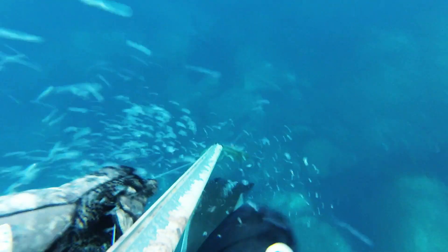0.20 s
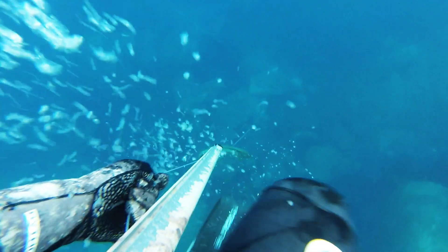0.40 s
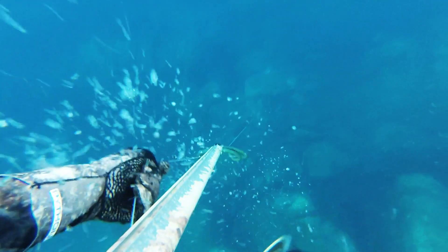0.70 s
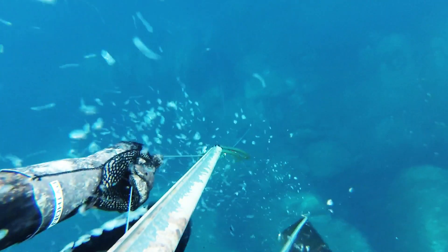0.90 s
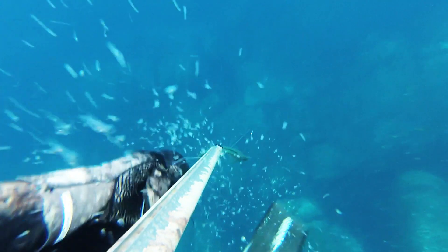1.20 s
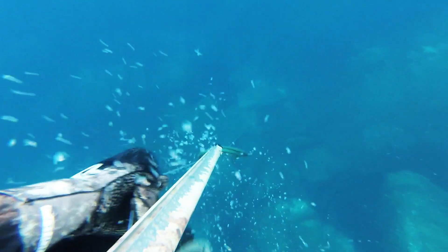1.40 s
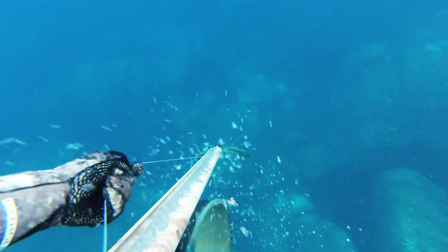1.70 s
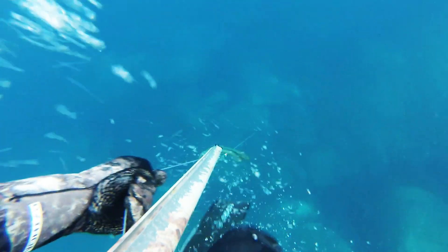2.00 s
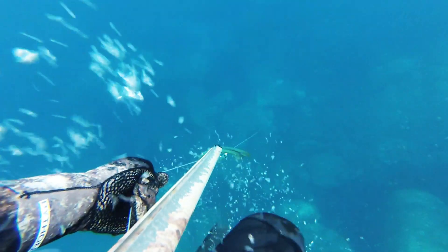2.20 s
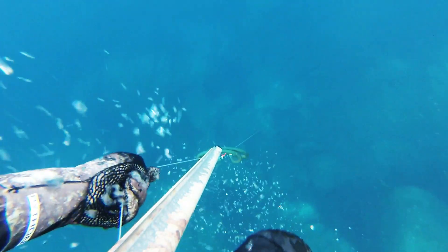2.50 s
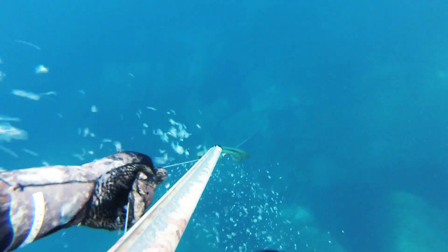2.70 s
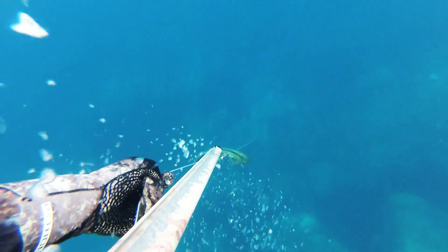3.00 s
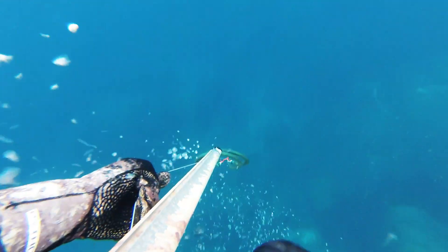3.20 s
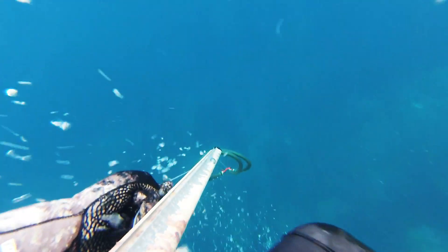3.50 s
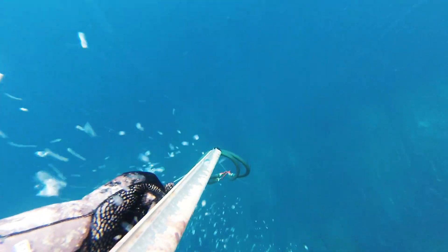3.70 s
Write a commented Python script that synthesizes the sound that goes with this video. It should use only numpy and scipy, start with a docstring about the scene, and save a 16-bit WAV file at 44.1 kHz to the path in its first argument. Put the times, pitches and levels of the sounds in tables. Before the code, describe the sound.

Underwater swimming strokes begin around 0.2 s, heard through a resonant waterproof camera case. Until about 3.2 s, gurgling churn pulses two or three times a second, each with deep swirl, fizzing wash and a warbling rush that rises and falls. A hard gear knock lands near 0.3 s, duller ones later. Bubbles and crackling ticks dot it. A weak stir ends around 3.6 s, leaving quiet swirl, hiss and faint high whine.

```python
"""Under water, inside a waterproof camera housing: a diver swims with a speargun.
Nine strokes, with a few weaker stirs before and after them, stir the water into gurgling lumps, a deep swirl
and a fizzing wash. Surges of speed bring a turbulent rush and a vortex tone that rise and fall with the speed.
Resonances of the housing colour the water noise. Gear knocks, bubbles ring, and sharp ticks dot the sea's hiss,
with a faint steady whine on top."""
import sys
import numpy as np
from scipy import signal
from scipy.fft import rfft, irfft
from scipy.io import wavfile

SR = 44100
rng = np.random.default_rng(int(sys.argv[2]) if len(sys.argv) > 2 else 0)


def store_pcm(level_fs):
    """Save levels as 16-bit WAV."""
    pcm = np.round(np.clip(level_fs, -1, 1) * 32767).astype(np.int16)
    wavfile.write(sys.argv[1], SR, np.atleast_2d(pcm).T)


N = 167580  # length in samples

# strokes and weaker stirs of the water; the levels are taken before the overall trims and the housing:
# (start [s], end [s], rise [s], churn level [dB], deep swirl level [dB], wash level [dB])
STROKE_TABLE = [(0.165, 0.389, 0.0058, -42, -47.5, -57), (0.603, 0.955, 0.0096, -40, -45, -65),
                (1.118, 1.317, 0.0023, -35, -43, -61.5), (1.481, 1.731, 0.0071, -38.5, -48.5, -58),
                (1.872, 2.119, 0.013, -39.5, -46.5, -62), (2.214, 2.497, 0.0038, -41.5, -48, -62),
                (2.58, 2.638, 0.0026, -43.5, -71, -80), (2.648, 2.833, .0024, -37.5, -46, -61.5),
                (2.826, 2.97, 0.019, -45.5, -55, -67), (3.014, 3.178, 0.01, -41.5, -46, -57),
                (3.157, 3.346, 0.0076, -60.5, -56.5, -65.5), (3.367, 3.564, 0.0036, -44.5, -57, -62.5)]
# surges of speed as the water is stirred; the levels are taken before the overall trims and the housing:
# (time of top speed [s], rise [s], fall [s], top pitch [Hz], rush level [dB], vortex tone level [dB])
SURGE_TABLE = [(0.271, 0.07, 0.085, 1020, -39.5, -33.5), (.385, 0.043, 0.034, 790, -45.5, -46),
               (.745, 0.097, 0.062, 920, -40.5, -39.5), (0.874, 0.084, 0.078, 790, -48.5, -44),
               (1.191, 0.05, 0.052, 680, -47, -50), (1.245, 0.053, 0.066, 830, -37, -38),
               (1.577, 0.055, 0.075, 929.7, -40.5, -36), (1.695, 0.077, 0.07, 770, -47.5, -46.5),
               (1.935, 0.038, 0.061, 750, -48, -42), (2.035, 0.1, 0.079, 800, -40.5, -33.5),
               (2.333, 0.055, 0.064, 1015, -38.5, -33.5), (2.425, 0.094, 0.053, 680, -43.5, -65),
               (2.699, 0.058, 0.052, 680, -40, -38), (2.764, 0.055, 0.06, 898, -44, -43.5),
               (2.88, 0.084, .12, 620, -54, -45), (3.09, 0.065, 0.065, 880, -40.5, -36),
               (3.465, 0.065, 0.064, 630, -44, -45.5)]


def from_db(db):
    """Decibels to gain."""
    return 10 ** (np.asarray(db) / 20)


def rms_one(x):
    """Scale to an rms of 1."""
    return x / np.sqrt(np.mean(x ** 2) + 1e-20)


def drift(rate):
    """Slow random wandering with an rms of about 1; a higher rate [Hz] wanders faster."""
    step = 40  # samples between the points of the slow curve
    r = np.exp(-2 * np.pi * rate * step / SR)
    raw = rng.standard_normal(N // step + 2002)
    slow = signal.lfilter([1], [1, -2 * r, r * r], raw)[2000:]  # drop the filter's start-up
    return np.interp(np.arange(N) / step, np.arange(len(slow)), rms_one(slow))


def colour(x, spectrum):
    """Give a signal the spectrum's gains, with nothing below 12 Hz."""
    hz, db = np.transpose(spectrum)
    bins = np.arange(N // 2 + 1) * SR / N + 1e-3
    gain = from_db(np.interp(np.log(bins), np.log(hz), db)) * (bins > 12)
    return irfft(rfft(x) * gain, N)


def noise(spectrum):
    """Noise of the given spectrum, rms 1."""
    return rms_one(colour(rng.standard_normal(N), spectrum))


def grains(per_s, spread_db):
    """Random impulses of either sign, mostly small with a few larger ones."""
    size_db = spread_db * np.minimum(rng.exponential(1, N), 3)
    sizes = from_db(size_db) * rng.choice([-1, 1], N)
    return sizes * (rng.random(N) < per_s / SR)


def fizz(spectrum):
    """Dense tiny collapses of uneven size, rms 1."""
    return rms_one(colour(grains(per_s=900, spread_db=4.5), spectrum))


def ring(clicks, hz, t60):
    """A unit click sets a sine of height about 1 ringing; it drops by 60 dB in t60 seconds."""
    r = np.exp(-np.log(1000) / (t60 * SR))
    w = 2 * np.pi * hz / SR
    return signal.lfilter([0, np.sin(w)], [1, -2 * r * np.cos(w), r * r], clicks + 1e-18)


def swell(t, start, end, rise_s, fall_s):
    """Smooth attack, hold and release."""
    attack = (1 + np.tanh((t - start) / rise_s / 2)) / 2
    release = (1 - np.tanh((t - end) / fall_s / 2)) / 2
    return attack * release


def speed_of(age, rise_s, fall_s):
    """Speed in a surge, 1 at its top."""
    return 1 / (1 + (age / np.where(age < 0, rise_s, fall_s)) ** 2)


def stirring(t):
    """Near 1 while a stroke drives the water, near 0 between strokes; it stalls just before a stroke ends."""
    lead_s, stall_s = .015, .01
    drive = sum(swell(t, start, end - lead_s, rise_s, stall_s) for start, end, rise_s, *_ in STROKE_TABLE)
    return np.minimum(1, drive)


def housing(x):
    """Each resonance of the case lifts a narrow band and lets it ring, or weakens it if its boost is negative."""
    # resonances of the case: (pitch [Hz], width [Hz], boost [dB])
    resonances = [(87.8, 13.6, 10), (155.4, 6.4, 12), (313.7, 25.5, 11), (568, 78, 4.5), (743, 32.2, 12),
                  (1670, 130, 9), (2114, 930, -5.5)]
    for hz, width_hz, boost_db in resonances:
        r = np.exp(-np.pi * width_hz / SR)
        top = np.array([1, 0, -1]) * (1 - r * r) / 2
        bottom = [1, -2 * r * np.cos(2 * np.pi * hz / SR), r * r]
        x = x + (from_db(boost_db) - 1) * signal.lfilter(top, bottom, x)
    return x


def sea():
    """The sea's steady hiss is random noise with a shaped spectrum, before the housing."""
    # spectrum of the open water: (frequency [Hz], relative level [dB])
    sea_spectrum = [(30, 15), (150, 2), (300, -3), (750, -24), (1250, -13.5), (1800, -14.5), (2800, -12),
                    (4200, -22), (5000, -19.5), (6800, -20), (8000, -16.5), (8900, -22), (9900, -23),
                    (11000, -23), (13300, -17.5), (15000, -41)]
    return from_db(-69.5) * noise(sea_spectrum)


def whine():
    """A very faint, high, nearly steady sine wavers slightly in pitch."""
    hz = 13135 + 10 * drift(11.0)
    return from_db(-92) * np.sin(2 * np.pi * np.cumsum(hz) / SR)


def ticks(size=300):
    """Near snaps, dull or bright, each a crack with a brief scatter behind it, over a crackle of far ones."""
    # near ticks, probably snapping shrimp; brightness tilts the level around 7 kHz:
    # (time [s], level before trims [dB], brightness [dB per octave])
    near_snaps = [(.404, -59, -4), (0.617, -53, 11), (.8245, -55, 14), (.8589, -49, 9),
                  (0.8748, -66, -20.5), (0.9408, -52.5, -2.5), (0.987, -56, 9), (1.175, -52, -3),
                  (1.5514, -50.5, 6), (1.8862, -42, -2), (2.0036, -54.5, 5), (2.014, -54, 7),
                  (2.2455, -56.5, 6), (2.4617, -63, 7), (2.581, -49, 5), (2.66, -53, 7), (2.6843, -52, 6),
                  (2.7272, -43, -6), (2.792, -43, -2.5), (2.814, -52, 12), (2.835, -57, 3), (2.846, -53, 0),
                  (2.968, -53, -2.5), (3.0697, -52.5, 1), (3.1254, -49, 2), (3.491, -57, 1),
                  (3.5414, -63, 6)]
    # what a tick rings with: (pitch [Hz], level [dB], time to drop 60 dB [s])
    snap_modes = [(3160, -15, 0.01), (3970, -7, 0.0034), (4840, -11, 0.01), (5650, -14, 0.015),
                  (6540, -5.5, 0.0045), (8040, -5.5, 0.0067), (9940, -2, 0.0023), (12100, -7.5, 0.0015),
                  (13400, -35, .003)]
    trim_db, colour_db = -1.5, 2  # colour: random spread of each mode's level
    scatter_s, scatter_db = .0014, -1
    far_colour_db = 5.5

    far = from_db(-76) * grains(per_s=200, spread_db=4)
    fade = np.exp(-np.arange(size) / SR / scatter_s)
    scatter_shape = from_db(scatter_db) * fade / np.linalg.norm(fade)
    out = np.zeros(N)
    for hz, mode_db, t60 in snap_modes:
        clicks = far * from_db(far_colour_db * rng.standard_normal(N)) * rng.choice([-1, 1], N)
        for time_s, level_db, brightness in near_snaps:
            snap = scatter_shape * rng.standard_normal(size)
            snap[0] += rng.choice([-1, 1])  # the crack itself
            tilt_db = brightness * np.log2(hz / 7000)
            gain = from_db(level_db + trim_db + tilt_db + colour_db * rng.standard_normal())
            start = int(time_s * SR)
            clicks[start:start + size] += snap * gain
        out += from_db(mode_db) * ring(clicks, hz, t60)
    return out


def water(t):
    """Each stroke buffets the case with gurgling pressure lumps; a deep swirl follows it and lingers."""
    # spectrum of the gurgling churn: (frequency [Hz], relative level [dB])
    churn_spectrum = [(30, 18), (70, -18.5), (130, 9.5), (220, 2), (400, 0), (600, -5.5), (800, -17.5),
                      (1100, -61), (2000, -74)]
    # spectrum of the deep swirl: (frequency [Hz], relative level [dB])
    swirl_spectrum = [(15, 6.5), (26, -3), (45, -6.5), (60, -4), (76, -11), (110, -9.5), (170, -14),
                      (230, -48), (500, -27.5), (1500, -59)]
    churn_trim_db, churn_fall_s = -7, 0.018
    swirl_lag_s, swirl_edge_s = 0.032, .03
    churn, swirl = np.zeros(N), np.zeros(N)
    for start, end, rise_s, churn_db, swirl_db, _ in STROKE_TABLE:
        churn += from_db(churn_db + churn_trim_db) * swell(t, start, end, rise_s, churn_fall_s)
        swirl += from_db(swirl_db) * swell(t - swirl_lag_s, start, end, swirl_edge_s, swirl_edge_s)

    # lumps of uneven size over a smoother noise
    lumps = rms_one(colour(grains(per_s=460, spread_db=5), churn_spectrum))
    gurgle = lumps + from_db(-5.5) * noise(churn_spectrum)
    gurgling = gurgle * churn * from_db(3 * drift(31))

    # a steady floor of swirl settles by 7 dB once the kicking stops
    settle_at_s, settle_s, settle_db = 3.56, .04, -7
    settled = np.clip((t - settle_at_s) / settle_s, 0, 1)
    floor = from_db(-55.5 + settle_db * settled)
    swirling = noise(swirl_spectrum) * np.hypot(swirl, floor) * from_db(4.5 * drift(8.7))
    return gurgling + swirling


def tiny_bubbles(count=16):
    """The wake is full of tiny bubbles: faint blips at random times, each at one of a set of pitches."""
    ring_cycles = 30  # cycles in which a blip drops by 60 dB
    born = from_db(-69) * grains(per_s=45, spread_db=2.5)
    dealt = rng.integers(0, count, N)  # which pitch each blip gets
    out = np.zeros(N)
    for k, hz in enumerate(np.geomspace(850, 2450, count)):
        out += ring(born * (dealt == k), hz, ring_cycles / hz)
    return out


def knocks():
    """Gear knocks on the housing: a softer contact is a duller click into the same ringing modes."""
    # contacts: (time [s], click level [dB], hardness as cut-off [Hz])
    contacts = [(0.09, -46, 245), (0.2777, -18, 3480), (0.9577, -50, 905), (1.137, -30, 352),
                (2.341, -27, 496), (2.571, -51, 900), (2.648, -51, 2020), (2.772, -29, 790),
                (3.131, -33, 450)]
    # what a knock rings with: (pitch [Hz], level [dB], time to drop 60 dB [s])
    case_modes = [(29.1, -19, 0.79), (168.5, -10.5, 0.16), (340, -5, 0.065), (648, 0.5, 0.032),
                  (823, 1.5, 0.01), (1088, -10, 0.023), (2017, -8.5, 0.017), (3960, -42, 0.018)]
    clicks = np.zeros(N)
    for time_s, level_db, hard_hz in contacts:
        r = np.exp(-2 * np.pi * hard_hz / SR)
        click = from_db(level_db) * (np.arange(N) == int(time_s * SR))
        clicks += signal.lfilter([1 - r], [1, -r], click + 1e-18)
    out = np.zeros(N)
    for k, (hz, mode_db, t60) in enumerate(case_modes):
        out += (-1) ** k * from_db(mode_db) * ring(clicks, hz, t60)  # neighbours have opposite signs
    return out


def bubbles(t):
    """Each bubble pinches off quickly, rings with a slightly rising pitch and dies away."""
    # single bubbles, and at 2.668 s a short eddy tone of the seventh stroke that rings the same way: (start
    # [s], starting pitch [Hz], level [dB], attack [s], decay [s])
    single_bubbles = [(0.091, 328.7, -45, 0.00093, .014), (0.448, 1175, -57.5, 0.002, 0.01),
                      (.546, 1716, -62, 0.0017, 0.0084), (0.714, 1706, -45.5, 0.0039, 0.02),
                      (.908, 330, -36.5, 0.0091, 0.018), (.958, 570, -51.5, .001, .012),
                      (1.145, 318, -33, .002, 0.0097), (1.247, 1640, -51, 0.0018, .014),
                      (1.287, 736, -43, .004, 0.036), (1.531, 153.8, -33, .005, 0.024),
                      (2.174, 1270, -63, 0.0022, 0.024), (2.574, 600, -49, 0.0013, 0.016),
                      (2.668, 597.7, -28, 0.0035, 0.018), (2.824, 1270, -53.5, .002, 0.011),
                      (2.831, 1035, -53, .003, 0.023), (3.079, 1310, -50, 0.0036, .013),
                      (3.202, 480, -48, 0.0058, 0.026), (3.206, 1864, -60, 0.00064, 0.013),
                      (3.246, 1330, -53.5, .002, 0.0056), (3.256, 1740, -55.5, 0.00053, 0.0069),
                      (3.267, 550, -52, 0.0045, 0.016), (3.278, 1237, -53.5, 0.00064, 0.0078),
                      (3.599, 1246, -58.5, 0.00058, 0.0095), (3.691, 1960, -61, .001, 0.0046),
                      (3.759, 1300, -51.5, 0.0049, 0.013)]
    rise_per_s = 0.39  # pitch gain each second, as a share of the starting pitch
    wobble = 1 + .014 * drift(102)
    out = np.zeros(N)
    for start, hz, level_db, attack_s, decay_s in single_bubbles:
        age = np.maximum(t - start, 0)
        phase = 2 * np.pi * np.cumsum(hz * wobble * (1 + rise_per_s * age)) / SR
        attack = (1 + np.tanh((t - start) / attack_s)) / 2
        out += from_db(level_db) * np.sin(phase) * attack * np.exp(-age / decay_s)
    return out


def rush(t, count=13):
    """A crowd of flickering eddy tones arches up and down with each surge, over a fizz of finer turbulence."""
    # spectrum of the rush: (frequency [Hz], relative level [dB])
    rush_spectrum = [(200, 8.5), (450, -1.5), (800, 0), (950, -8), (1150, -8), (1380, -20.5), (1700, -12),
                     (2200, -12), (2500, -20), (2850, -28), (4200, -32), (7800, -32), (9000, -50),
                     (14000, -45)]
    trim_db, db_per_octave = -4, 13.5  # louder with each doubling of speed
    eddies, power = np.zeros(N), np.zeros(N)
    wander = np.array([1 + 0.013 * drift(61.7) for _ in range(count)])
    flicker = np.array([rms_one(from_db(5 * drift(20))) for _ in range(count)])
    for top_s, rise_s, fall_s, top_hz, rush_db, _ in SURGE_TABLE:
        near = np.abs(t - top_s) < .3
        speed = speed_of(t[near] - top_s, rise_s, fall_s)
        gain = from_db(rush_db + trim_db + db_per_octave * np.log2(speed))
        # eddies of many sizes: pitches relative to the main one
        ratios = np.linspace(.45, 3.1, count) + rng.normal(0, .05, count)
        hz = top_hz * ratios[:, None] * speed * wander[:, near]
        phase = 2 * np.pi * np.cumsum(hz, axis=1) / SR
        crowd = (flicker[:, near] * np.sin(phase)).sum(axis=0)
        eddies[near] += gain * crowd * from_db(-10)
        power[near] += gain ** 2
    fine = from_db(-6) * np.sqrt(power) * fizz(rush_spectrum)
    return colour(eddies, rush_spectrum) + fine


def vortices(t):
    """The main eddy glides up and down with the speed; it flares as it slows through the resonance."""
    trim_db, fade_s = -10, .05
    lock_hz, lock_width_hz, lock_db = 777, 48, 8  # the resonance that the tone locks on to
    slowing_db = 8  # the flare is weaker while speeding up, stronger while slowing
    glide_db, glide_below_hz, glide_edge_hz = 5, 660, 150
    overtone_ratio = 2.05
    wander = 1 + .018 * drift(57.4)
    flicker_db = 1.5 * drift(33) + 1.8 * drift(55)
    overtone = from_db(-15.5 + 3 * drift(86))
    # away from the resonance the tone breaks up
    fitful = stirring(t) * rms_one(from_db(4.5 * drift(26)))

    out = np.zeros(N)
    for top_s, rise_s, fall_s, top_hz, _, tone_db in SURGE_TABLE:
        age = t - top_s
        hz = top_hz * speed_of(age, rise_s, fall_s)
        phase = 2 * np.pi * np.cumsum(hz * wander) / SR
        detune = (hz - lock_hz) / lock_width_hz
        flare = from_db(slowing_db * (np.tanh(age / 0.015) - 1) + lock_db)
        lock = np.exp(-detune ** 2 / 2) * flare
        low_pitch = (1 - np.tanh((hz - glide_below_hz) / glide_edge_hz)) / 2
        glide = fitful * from_db(glide_db) * low_pitch
        gain = from_db(tone_db + trim_db + flicker_db) * np.exp(-(age / fade_s) ** 2 / 2)
        main_tone = (lock + glide) * np.sin(phase)
        upper_tone = overtone * (hz / top_hz) ** 4 * np.sin(overtone_ratio * phase)
        out += gain * (main_tone + upper_tone)
    return out


def wash(t):
    """A fizz of collapsing bubbles builds just after a stroke begins, holds, and fades before it ends."""
    # spectrum of the wash: (frequency [Hz], relative level [dB])
    wash_spectrum = [(500, -21), (800, 6.5), (1150, 4), (1400, -0.5), (1750, -2.5), (2350, 6),
                     (2600, -17.5), (2900, -21.5), (4200, -28), (7800, -16), (9000, -27), (14000, -46)]
    delay_s, lead_s, rise_slower, fall_s = 0.041, 0.057, 3.6, 0.017
    level = np.zeros(N)
    for start, end, rise_s, _, _, wash_db in STROKE_TABLE:
        shape = swell(t, start + delay_s, end - lead_s, rise_slower * rise_s, fall_s)
        level += from_db(wash_db) * shape
    return fizz(wash_spectrum) * level


def scene():
    """The sounds reach both channels almost alike; very faint noise sets them apart."""
    t = np.arange(N) / SR
    flow = housing(sea() + water(t) + rush(t) + vortices(t) + wash(t))
    # very faint noise, shaped like the strokes, with opposite signs in the two channels
    side_noise = from_db(-40.5) * housing(water(t) + rush(t)) * np.array([[1], [-1]])
    hiss = from_db(-88) * rng.standard_normal((2, N))
    details = whine() + ticks() + tiny_bubbles() + knocks() + bubbles(t)
    return flow + side_noise + details + hiss


def record(dry):
    """The top is cut steeply above 15.4 kHz."""
    steep_cut = signal.ellip(12, .2, 70, 15400, fs=SR, output="sos")
    return signal.sosfilt(steep_cut, dry)


dry = scene()
out = record(dry)
store_pcm(out)
```